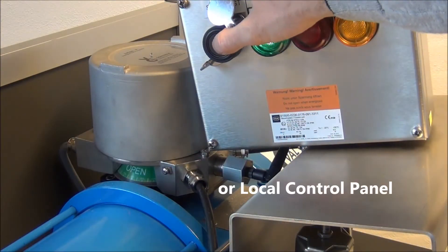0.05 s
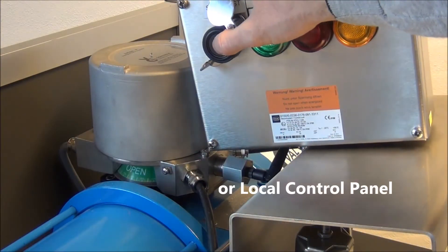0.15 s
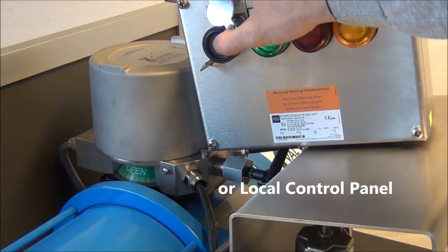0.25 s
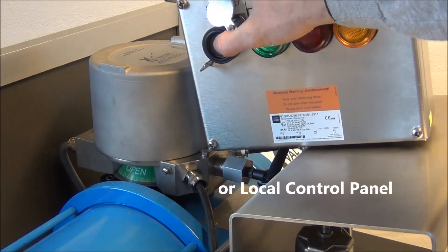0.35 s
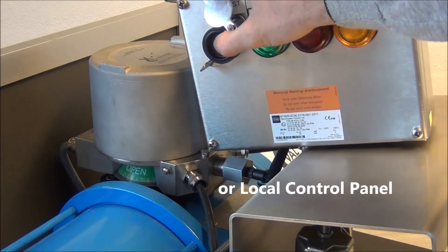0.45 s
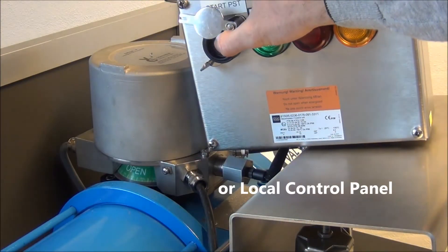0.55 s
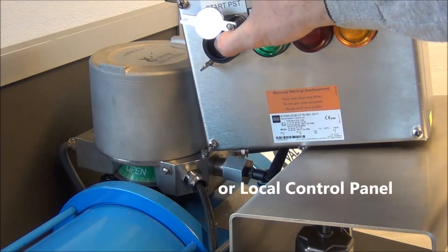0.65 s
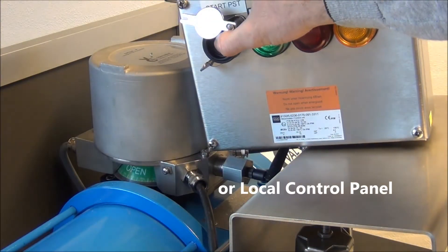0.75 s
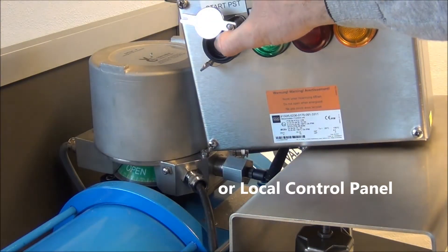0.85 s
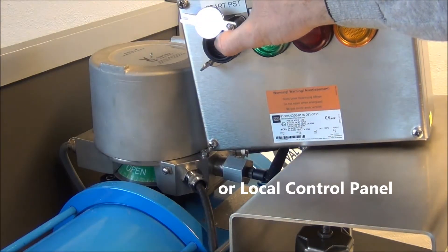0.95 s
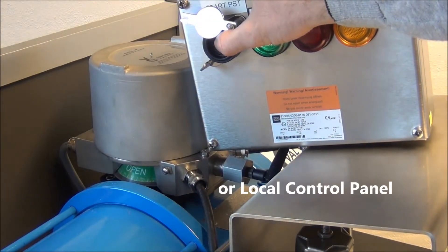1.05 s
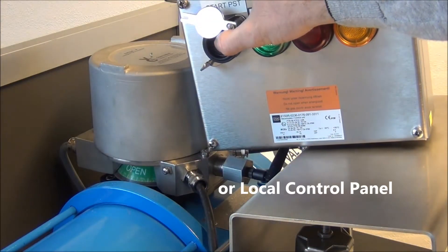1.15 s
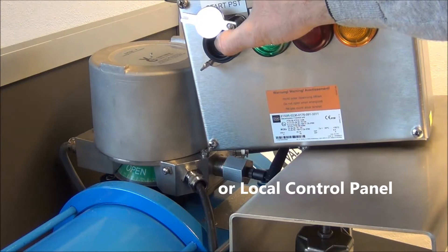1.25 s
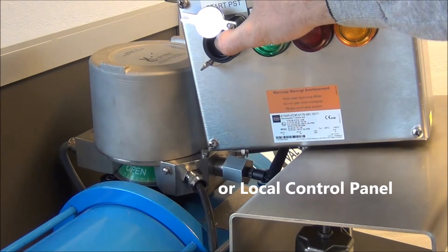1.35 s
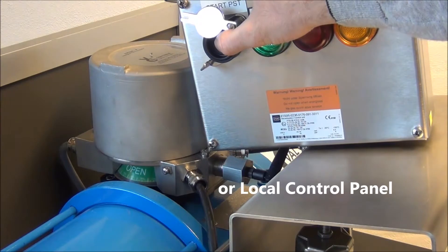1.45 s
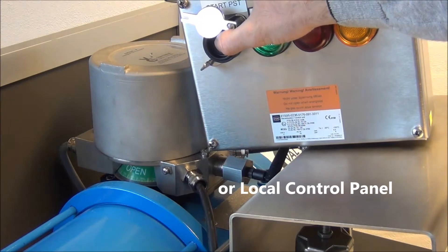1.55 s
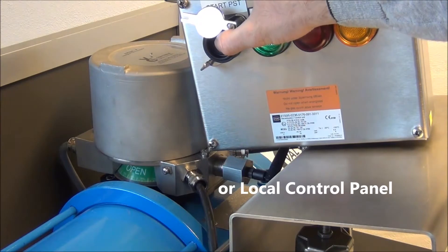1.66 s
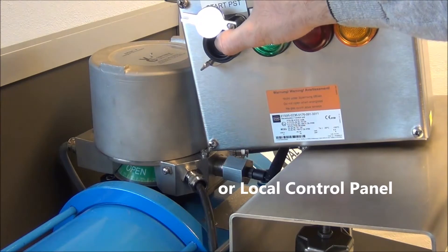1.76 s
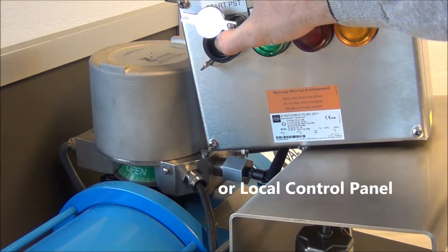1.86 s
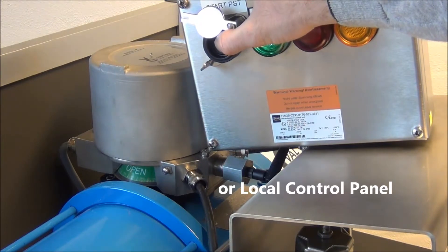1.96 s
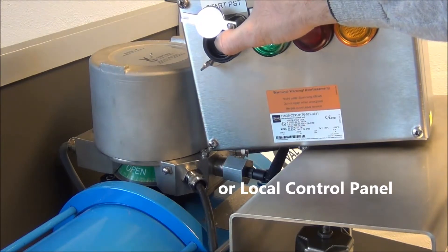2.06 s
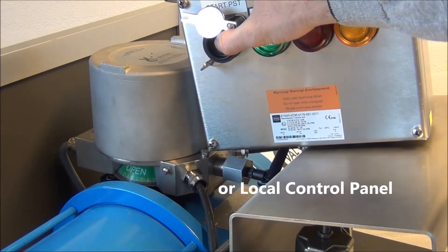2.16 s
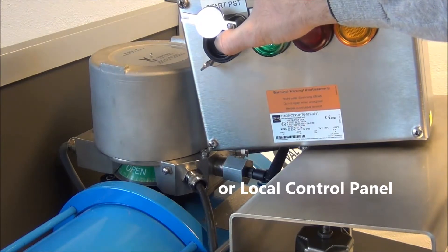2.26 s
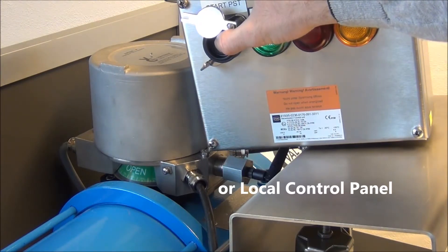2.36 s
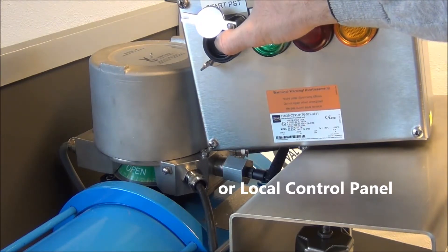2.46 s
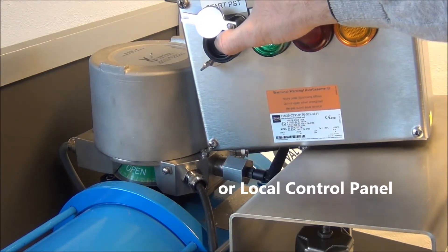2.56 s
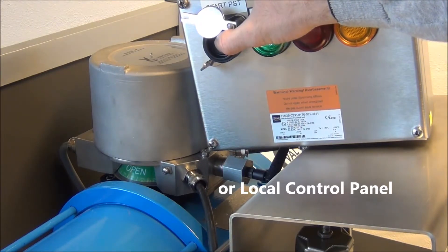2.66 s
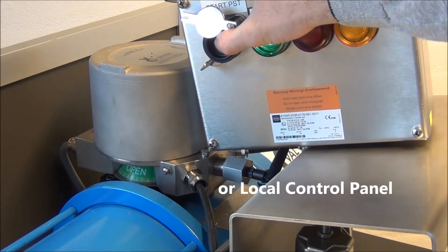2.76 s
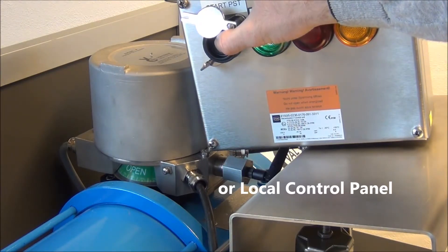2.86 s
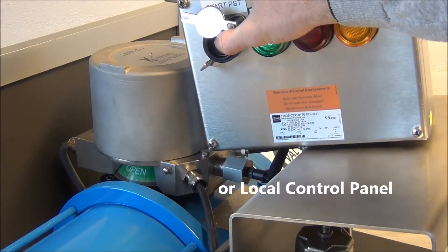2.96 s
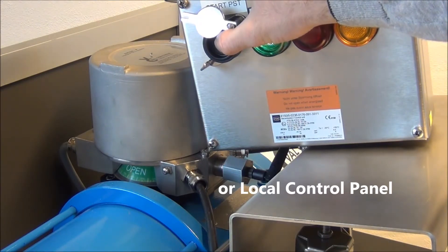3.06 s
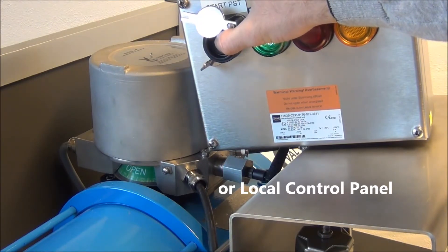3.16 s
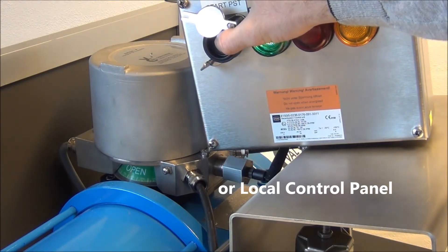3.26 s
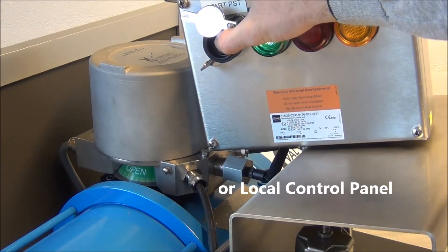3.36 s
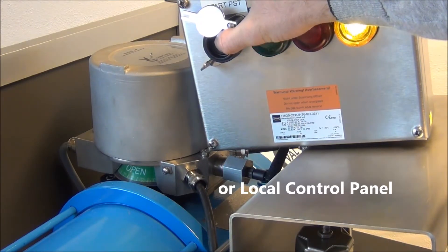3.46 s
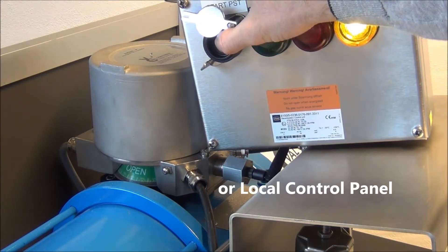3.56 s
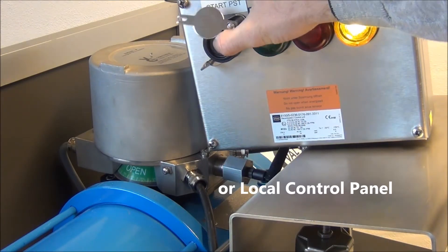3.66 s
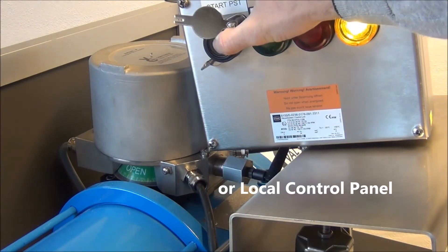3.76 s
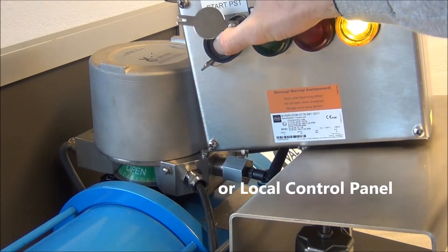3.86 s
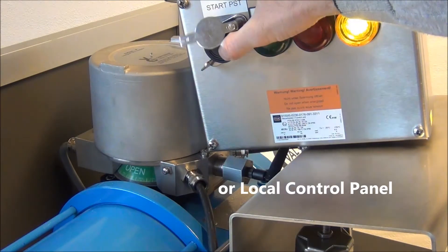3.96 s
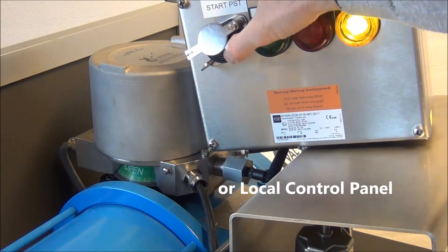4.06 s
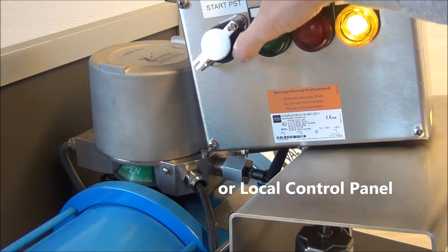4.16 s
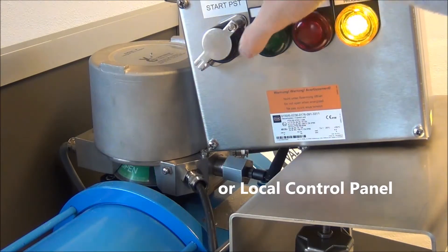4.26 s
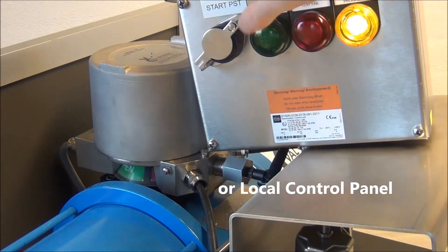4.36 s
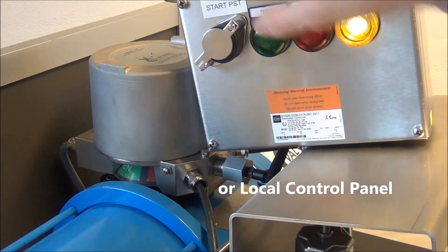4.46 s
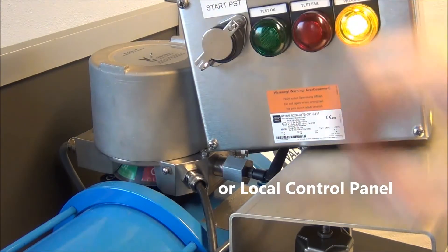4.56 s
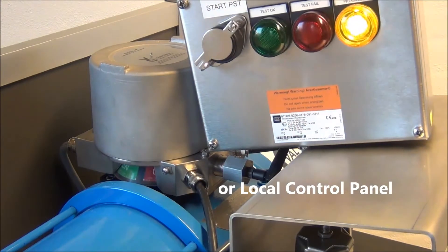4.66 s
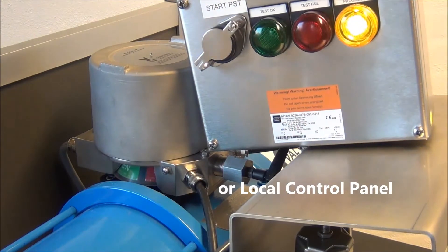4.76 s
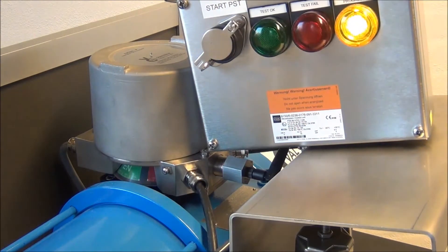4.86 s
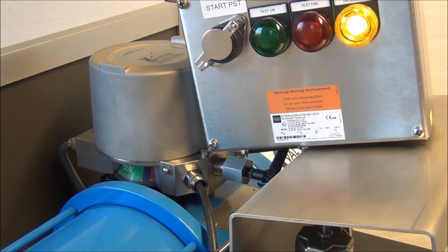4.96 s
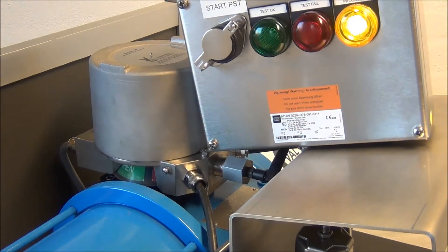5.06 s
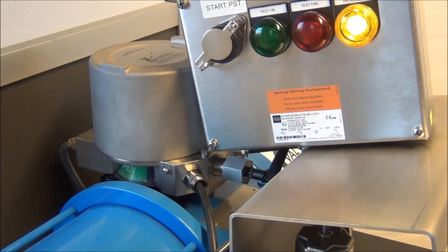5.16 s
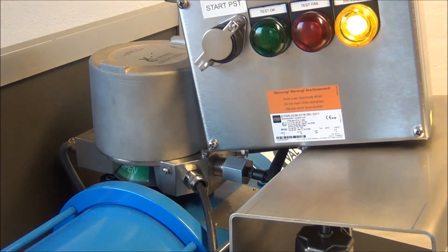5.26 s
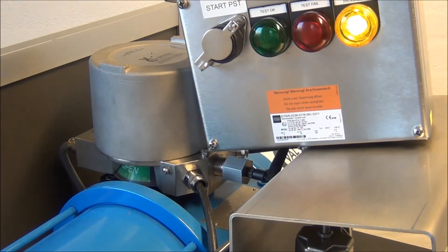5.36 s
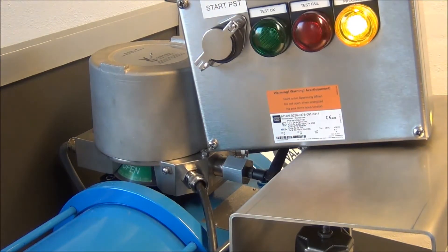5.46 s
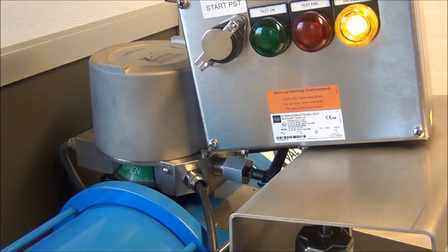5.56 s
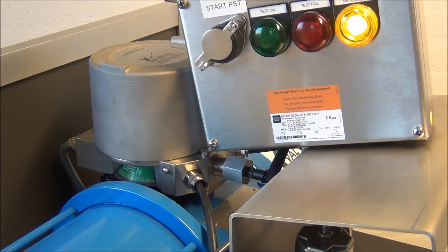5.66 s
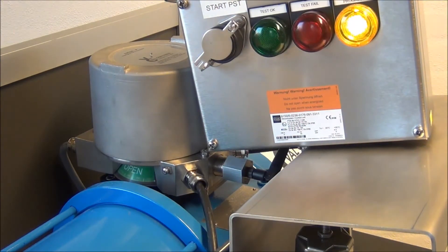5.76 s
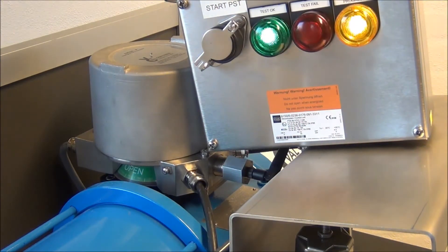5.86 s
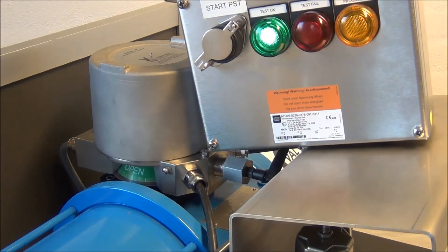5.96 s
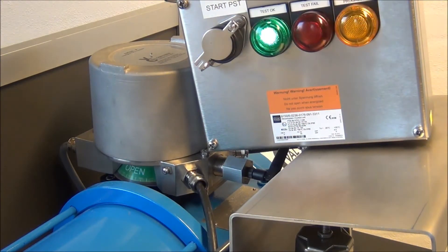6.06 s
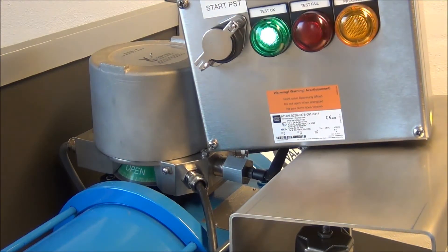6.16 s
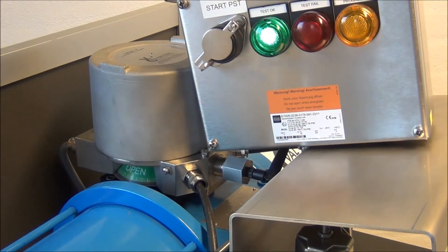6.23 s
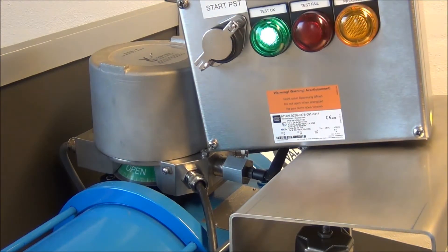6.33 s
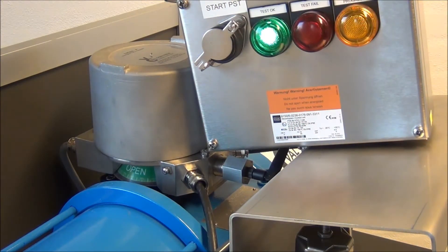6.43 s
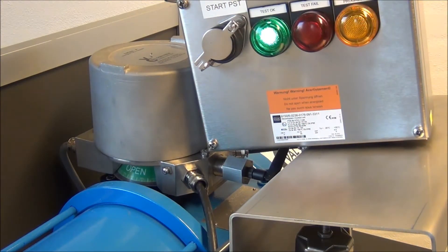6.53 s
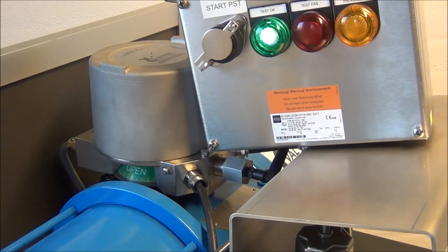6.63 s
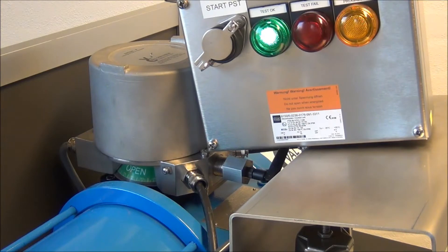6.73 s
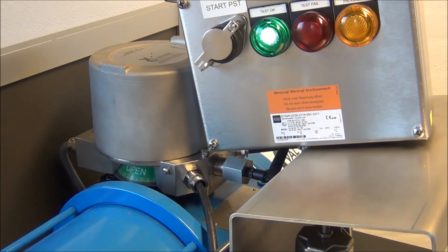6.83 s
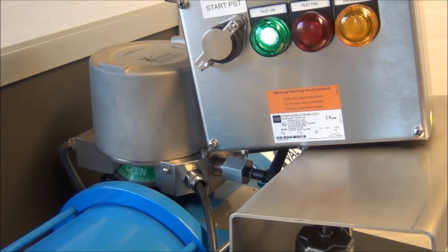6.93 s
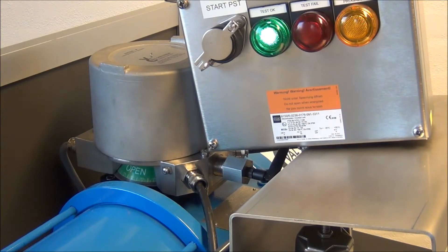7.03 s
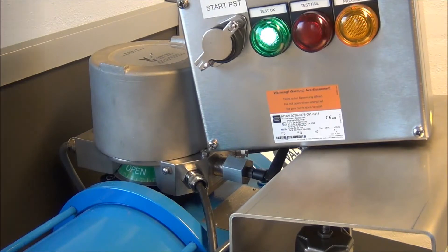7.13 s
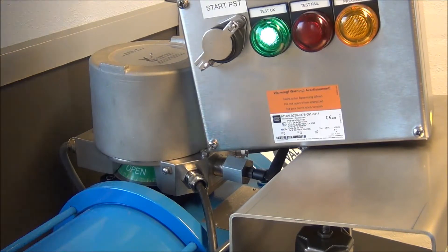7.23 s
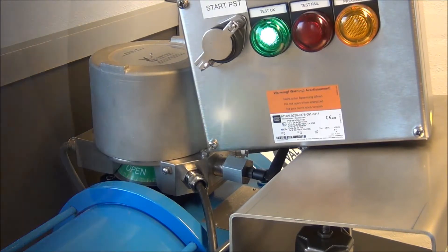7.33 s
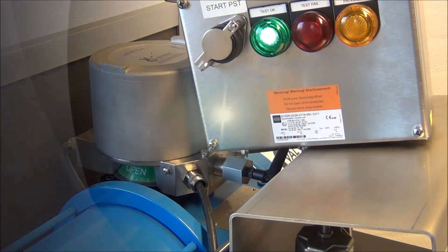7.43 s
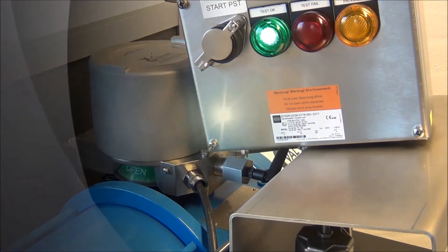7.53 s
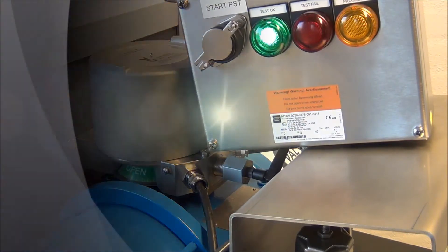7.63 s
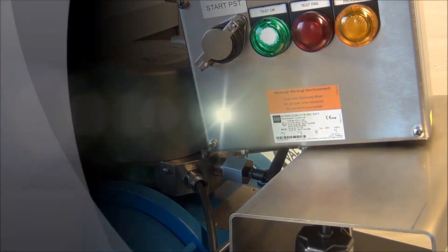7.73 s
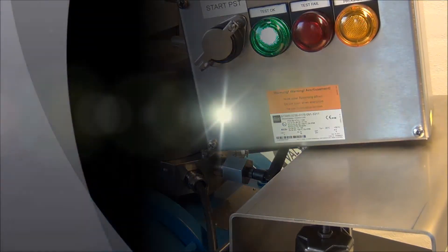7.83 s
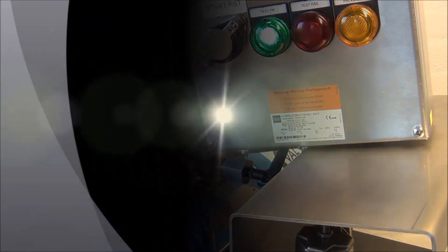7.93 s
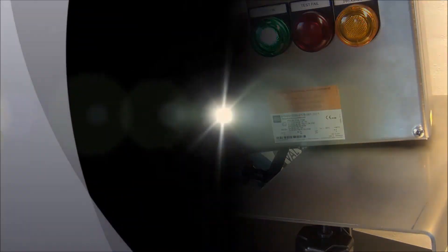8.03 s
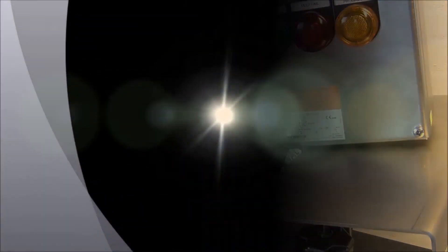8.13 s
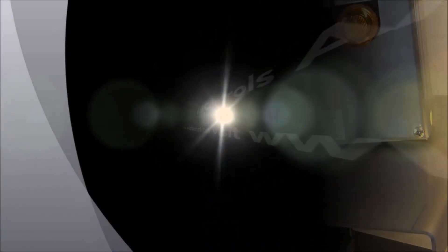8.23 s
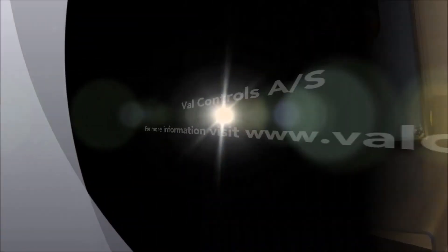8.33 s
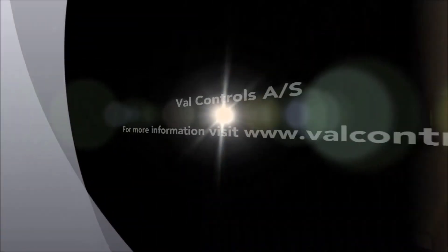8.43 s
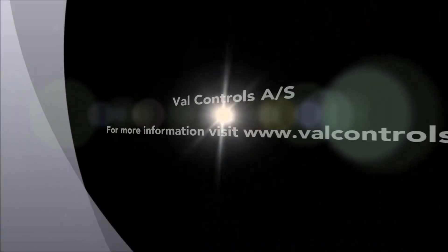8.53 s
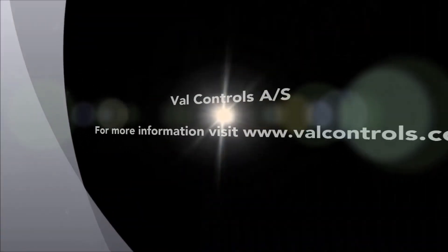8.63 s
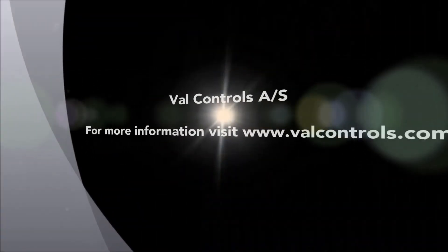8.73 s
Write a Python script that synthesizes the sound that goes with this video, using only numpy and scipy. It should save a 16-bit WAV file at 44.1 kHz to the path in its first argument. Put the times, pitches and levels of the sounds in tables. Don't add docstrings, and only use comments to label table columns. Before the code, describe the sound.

A close stereo microphone catches a pneumatic valve indoors. Light taps and a crisp, ringing spring-cover snap come first, over quiet rumble. A sharp double click bursts into a bright roaring exhaust, ending in a clank and quick hiss. Thin seal whistles and creeping air give way to a growing refill hiss, a small end-stop knock and a distant motor hum that slowly swells before an abrupt end.

```python
import sys
import numpy as np
from scipy import signal
from scipy.fft import rfft, irfft, next_fast_len
from scipy.io import wavfile
from scipy.ndimage import uniform_filter1d, map_coordinates

SR = 44100
rng = np.random.default_rng(int(sys.argv[2]) if len(sys.argv) > 2 else 0)


def to_linear_factor(level_db):
    exponent = np.asarray(level_db, float) / 20
    return 10 ** exponent


def transcribe(signal):
    frames = np.atleast_2d(signal).T
    limited = np.clip(frames, -1, 1)
    pcm = np.round(limited * 32767).astype(np.int16)
    wavfile.write(sys.argv[1], SR, pcm)


N = 387638


def unit(x):
    return x / np.sqrt(np.mean(x ** 2) + 1e-20)


def along(points, hz):
    f, v = np.transpose(points)
    return np.interp(np.log(hz + 1), np.log(f + 1), v)


def level(rows):
    s, db = np.transpose(rows)
    return to_linear_factor(np.interp(np.arange(N) / SR, s, db, left=-140, right=-140))


def swell(start, rise, hold, fall, db):
    top, release = start + rise, start + rise + hold
    return level([(start, db - 40), (top, db), (release, db), (release + fall, db - 40)])


def swells(rows):
    return sum(swell(*row) for row in rows)


def wobble(rate):
    knots = rng.standard_normal(int(N * rate / SR) + 4)
    return map_coordinates(knots, [np.arange(N) * rate / SR])


def filtered(x, response):
    m = next_fast_len(N + SR // 2)
    return irfft(rfft(x, m) * response(np.fft.rfftfreq(m, 1 / SR)), m)[..., :N]


def high_pass(hz, order):
    return lambda f: (1j * f / (hz + 1j * f)) ** order


def modes(table):
    def response(f):
        total = 0
        for k, (centre, width, db) in enumerate(table):
            total = total + (-1) ** k * to_linear_factor(db) * 1j * f * width / (centre * centre - f * f + 1j * f * width)
        return total
    return response


def lifted(spectrum, peaks):
    def response(f):
        humps = sum(db / (1 + (2 * (f - centre) / width) ** 2) for centre, width, db in peaks)
        return to_linear_factor(along(spectrum, f) + humps)
    return response


def spread(pair, alike, colour=np.ones_like):
    turn = lambda hz: np.arccos(np.clip(along(alike, hz), -1, 1)) / 2
    mid, side = filtered(pair, lambda hz: colour(hz) * [np.cos(turn(hz)), np.sin(turn(hz))])
    return np.array([mid + side, mid - side])


def rush(colour, alike, patchy_db):
    z = signal.stft(rng.standard_normal((2, N)), nperseg=512)[2]
    field = uniform_filter1d(rng.standard_normal(z.shape[1:]), size=6, axis=0)
    field = uniform_filter1d(field, size=10, axis=1)
    pair = signal.istft(z * to_linear_factor(patchy_db * unit(field)), nperseg=512)[1][:, :N]
    return unit(spread(pair, alike, colour))


def blows(times, dbs, t60s):
    force, t = np.zeros(N + SR), np.arange(SR // 5) / SR
    for s, db, t60 in zip(times, dbs, t60s):
        fading = to_linear_factor(db - 60 * t / max(t60, .004))
        force[round(s * SR):][:len(t)] += fading * rng.standard_normal(len(t))
    return force[:N]


def taps(times, dbs):
    return np.bincount(np.round(np.asarray(times) * SR).astype(int), to_linear_factor(dbs), N)


def struck(hits, table):
    rings = []
    for hz, mode_db, t60 in table:
        width = np.log(1000) / (np.pi * t60)
        rings.append((hz, width, mode_db - 20 * np.log10(2 * np.pi * width / SR)))
    return filtered(taps(*np.transpose(hits)), modes(rings))


def rub(gain, table, rough_db):
    return gain * unit(to_linear_factor(rough_db * wobble(60)) * filtered(rng.standard_normal(N), modes(table)))


# (frequency [Hz], density [dB per Hz])
ROOM_AIR = [(12, -38.5), (20, -7.5), (43, -5.5), (63, -0.5), (107, -12), (222, -10.5), (472, -14),
            (624, -12), (738, -14.5), (1060, -13.5), (1370, -17.5), (2080, -19), (2460, -20), (3160, -21.5),
            (16000, -26)]
# (frequency [Hz], left-right likeness [0-1])
ROOM_ALIKE = [(50, .995), (99, 1), (160, 0.54), (270, .5), (450, 0.32), (740, 0.44), (1220, 0.17),
              (2010, 0.16), (3330, 0.5), (5500, 0.53), (9080, 0.78), (15000, 0.93)]


def room_noise():
    air = rush(lifted(ROOM_AIR, []), ROOM_ALIKE, patchy_db=1.14)
    return to_linear_factor(-47) * air + to_linear_factor(-68) * np.sin(2 * np.pi * 15625 * np.arange(N) / SR)


# (multiple of shaft speed, level [dB])
STRONG_ORDERS = [(9, -2), (16, -4.5), (18, -9), (29, -10), (33, -14), (35, -3.5), (37, -7), (38, -10),
                 (39, 0.5), (40, -3), (41, -10), (44, 3.5), (45, -11), (46, -15), (48, -13), (58, -5.5),
                 (60, -12), (63, -13), (67, -13), (69, -14), (84, -14), (86, -15), (89, -19)]
# (frequency [Hz], width [Hz], level [dB])
CASING = [(254.1, 200, -3), (1330, 110, -3.5), (1890, 280, -1.5), (2490, 130, -3.5), (2690, 250, -4),
          (3430, 250, -14), (3623, 41, 1.5), (4250, 120, -17), (4180, 300, -19)]


def compressor():
    shaft_hz = 48.74 + 0.0317 * wobble(2)
    turn = 2 * np.pi * np.cumsum(shaft_hz) / SR
    orders = {k: -1 - k for k in range(1, 15)}
    orders |= {k: -15 for k in range(23, 33)}
    orders |= dict(STRONG_ORDERS)
    tones = np.zeros((2, N))
    for k, db in orders.items():
        phase = rng.uniform(0, 2 * np.pi)
        lead = rng.normal(0, 0.12) * min(k / 12, 1)
        tones += to_linear_factor(db + .9 * wobble(6)) * np.sin(k * turn + phase + np.array([[lead], [-lead]]))
    casing = (1 + .5 * np.cos(turn)) * rush(modes(CASING), [(300, 0.96), (3000, 0.82)], patchy_db=1.5)
    running = swell(start=6.1, rise=0.3, hold=N / SR, fall=1, db=0)
    return to_linear_factor([[.5], [-.5]]) * running * (to_linear_factor(-45.5) * unit(tones) + to_linear_factor(-49.5) * casing)


# (start [s], rise [s], hold [s], fall [s], level [dB])
START = (6.05, .25, .17, .3, -53)


def motor_shudder():
    return rub(swell(*START), [(58.5, 54, 0)], rough_db=3.0)


def duck(start, length, depth_db, attack, release):
    t = np.arange(N) / SR - start
    fallen = 1 - np.exp(-np.clip(t, 0, length) / attack)
    return depth_db * fallen * np.exp(-np.clip(t - length, 0, None) / release)


OPEN_S, SHUT_S = 3.522, 4.624
# (start [s], length [s], depth [dB])
DUCKS = [
    (-.3, .3, 3),
    (0.584, 1.07, 8.5),
    (3.507, 2.5, 17),
]


def automatic_gain():
    rest_db = 3
    slow_db = np.max([duck(*row, attack=0.1, release=2.24) for row in DUCKS], axis=0)
    squeeze_db = duck(OPEN_S, SHUT_S - OPEN_S, depth_db=10.5, attack=.25, release=.06)
    return to_linear_factor(rest_db - slow_db - squeeze_db)


# (frequency [Hz], width [Hz], level [dB])
PANEL = [(238.7, 9.3, 3.5), (475, 150, -9.5), (668, 42, -10.5)]
# (frequency [Hz], width [Hz], level [dB])
DOOR = [(450, 140, -5), (800, 110, -5.5), (987, 90, 4.5), (1250, 90, -2.5), (1650, 200, -6.5)]
# (time [s], tap level [dB], thud level [dB])
TOUCHES = [
    (0.1754, -20, -51),
    (0.193, -31.5, -45),
    (.298, -23.5, -37),
    (0.334, -37, -41.5),
    (0.389, -30, -49),
]
# (start [s], rise [s], hold [s], fall [s], level [dB])
THUMB = [
    (.15, .03, .05, .2, -50),
    (.29, .008, .03, .1, -40),
    (.33, .04, .03, .1, -51),
    (.4, .045, .1, .06, -40),
]


def hand_on_box():
    s, tap_db, thud_db = np.transpose(TOUCHES)
    tapping = filtered(blows(s, tap_db, np.full(len(s), .04)), modes(DOOR))
    thuds = filtered(taps(s, thud_db + 48.5), modes(PANEL))
    return tapping + thuds + to_linear_factor(0.5) * rub(swells(THUMB), PANEL[:1], rough_db=2.0)


# (time [s], peak level [dB])
TICKS = [(.445, -46.5), (.448, -43), (.451, -41), (.4535, -41), (.4702, -32), (.4765, -42.5), (.481, -41),
         (.485, -43), (.4895, -43), (.494, -42.5), (.507, -46.5), (.511, -46), (.5155, -37), (.5172, -36),
         (.5225, -30), (.5255, -24), (.533, -36), (.538, -35.5), (.5452, -31.5), (.5545, -30),
         (.5587, -18.5), (.5902, -12), (.5922, -17), (0.5965, -18), (.5965, -20), (0.6016, -18),
         (.6905, -38), (.6918, -37), (.6931, -39)]
# (frequency [Hz], width [Hz], level [dB])
COIL = [(4540, 790, 1), (5650, 610, -6.5)]


def spring_coils():
    s, db = np.transpose(TICKS)
    return filtered(taps(s, db + 26.5), lambda f: modes(COIL)(f) ** 2)


# (time [s], spring level [dB], lid level [dB], box level [dB])
COVER_HITS = [(0.418, -35, -42.5, -47), (0.446, -34, -54, -36), (0.469, -40, -54, -56),
              (0.4912, -36, -57, -44.5), (0.517, -41, -51, -42), (0.5253, -28, -44, -26.5),
              (0.538, -28, -39, -38.5), (0.5438, -24, -38, -31), (0.5518, -21, -34, -14.5),
              (0.5584, -13.5, -25.5, -20.5), (0.565, -29.5, -29.5, -25), (0.5897, -14, -13, -29.5),
              (0.5933, -10.5, -18, -23), (0.6018, -4.5, -11, -16), (0.6074, -12, -19, -19.5),
              (0.6135, -13.5, -29, -22.5), (0.6354, -34, -41, -34.5), (0.689, -48, -58, -47.5)]
# (frequency [Hz], width [Hz], level [dB])
COVER_BRIGHT = [(2970, 110, -2), (3480, 270, 0.5), (4600, 1200, -3.5), (6080, 80, 2), (6600, 50.3, 2),
                (8000, 1100, -12.5), (8270, 54, 2)]
# (frequency [Hz], width [Hz], level [dB])
COVER_MIDDLE = [(700, 100, -8), (954, 48, -6), (1430, 110, 2.5), (1558, 86, -5.5), (1630, 100, -5),
                (1800, 150, -2), (2570, 200, -11.5)]
# (frequency [Hz], width [Hz], level [dB])
LID = [(9470, 850, -1.5), (11470, 89, 2.5), (12170, 44, 10), (12980, 120, -6), (14760, 68.6, -14.5)]
# (start [s], rise [s], hold [s], fall [s], level [dB])
HINGE = (.24, .2, .03, .2, -43)
# (time [s], level [dB])
SNAPS = [
    (.5902, -37.5),
    (.6022, -32.5),
    (.6075, -37),
]
# (frequency [Hz], level [dB], t60 [s])
AFTER_RING = [(1427, -10, .22), (2845, -2, .24), (2885, -5, .2), (3015, -7, .2), (3580, -8, .15),
              (4468, -9, .09), (5448, -12, .2), (6212, -12, .2), (6455, -10, .25), (6557, -9, .2),
              (6718, -12, .22), (8554, -10, .2), (14760, -6, .2)]


def cover():
    s, spring_db, lid_db, box_db = np.transpose(COVER_HITS)
    t60 = np.full(len(s), .024)
    crack = lambda f: modes(LID)(f) + to_linear_factor(-4.0) * high_pass(5000, 2)(f)
    out = filtered(blows(s, spring_db + 2.5, t60), modes(COVER_BRIGHT))
    out += filtered(blows(s, lid_db + 7.5, t60), crack)
    out += filtered(blows(s, box_db + 16.5, t60), modes(COVER_MIDDLE))
    out += filtered(taps(s, box_db + 40), modes(PANEL))
    out += struck(SNAPS, AFTER_RING)
    return out + to_linear_factor(-1.0) * rub(swell(*HINGE), COVER_MIDDLE, rough_db=4.0)


# (time [s], clank level [dB], thud level [dB], rattle t60 [s])
KNOCKS = [(1.864, -40, -66, 0.043), (3.5038, -9.5, -20.5, 0.046), (3.5234, -18, -24, 0.024),
          (4.6396, -22.5, -35.5, 0.13), (4.8496, -51, -36.5, 0.05), (4.874, -59, -53, 0.052),
          (6.1490, -35, -54, 0.098), (6.1540, -33, -45, 0.11), (6.2239, -36.5, -48, 0.08),
          (6.2446, -44, -39, 0.045), (6.3686, -44, -42, 0.085)]
# (frequency [Hz], width [Hz], level [dB])
CYLINDER = [(1120, 180, -2.5), (1562, 90, 0), (2030, 150, -1.5), (2520, 92, -2.5), (3200, 220, -3),
            (4150, 430, -6), (5140, 500, -3.5)]
# (frequency [Hz], width [Hz], level [dB])
YOKE = [(190, 37, -4.5), (300, 50, 2), (460, 86, 0.5), (690, 310, -7)]
# (time [s], level [dB])
STOPS = [
    (6.1485, -44),
    (6.1525, -37.5),
    (6.1565, -45),
    (6.1755, -47),
    (6.228, -52),
]
# (frequency [Hz], level [dB], t60 [s])
END_CAP = [(743, -7.5, 0.071), (1530, -2.5, 0.051), (2000, -6, .04), (2444, -1, .09), (3320, -1.5, .055),
           (4296, -17, 0.073), (5300, -9, .07)]
# (start [s], rise [s], hold [s], fall [s], level [dB])
GROAN = (4.62, .13, .74, .15, -67)
# (start [s], rise [s], hold [s], fall [s], level [dB])
SLIDE = [
    (4.621, 0.0061, 0.0043, 0.12, -27.5),
    (4.708, 0.051, .04, 0.13, -43),
    (4.8, 0.061, .02, 1, -51),
    (6.14, 0.016, 0.11, 0.053, -51),
    (6.298, .07, .01, .12, -73),
]


def knocks():
    s, clank_db, thud_db, t60 = np.transpose(KNOCKS)
    clanks = filtered(blows(s, clank_db + 8, t60), modes(CYLINDER))
    thuds = filtered(blows(s, thud_db + 16.0, t60), modes(YOKE))
    groan = rub(swell(*GROAN), [(112, 16, 0)], rough_db=0.0)
    slide = to_linear_factor(-4.5) * rub(swells(SLIDE), YOKE, rough_db=2.5)
    return clanks + thuds + struck(STOPS, END_CAP) + groan + slide


# (time [s], level [dB], frequency [Hz])
POPS = [
    (3.5036, -15, 231.2),
    (3.5232, -16, 534),
    (4.63, -21.5, 328),
    (6.371, -35.5, 300),
]


def pops():
    out, t = np.zeros(N), np.arange(SR // 20) / SR
    for s, db, hz in POPS:
        out[round(s * SR):][:len(t)] += to_linear_factor(db) * np.sin(2 * np.pi * hz * t) * np.exp(-1.2 * hz * t)
    return filtered(out, high_pass(70, 2))


# (frequency [Hz], left-right likeness [0-1])
VENT_ALIKE = [(60, .999), (750, .999), (1200, .987), (2400, .994), (4400, .993), (8000, .945), (15000, .91)]
# (start [s], rise [s], hold [s], fall [s], level [dB])
CREEP = [
    (4.62, 0.058, 0.0074, 0.17, -34.5),
    (4.6, 0.18, 0.043, 2.3, -50.5),
    (4.9, 0.46, .05, 1.8, -57.5),
]
# (frequency [Hz], density [dB per Hz])
CREEP_COLOUR = [(410, -49), (700, -24.5), (1010, -11), (1430, -10.5), (1620, -11), (2610, -7), (2810, -7.5),
                (4650, -7.5), (9000, -10.5), (13000, -19), (16000, -28)]
# (frequency [Hz], width [Hz], lift [dB])
CHAMBER = [(1680, 60, 5.5), (2260, 80, 4.5), (2610, 150, -2), (2850, 90, 6.5), (3500, 81, 2),
           (3590, 60, 3.5), (4070, 500, -3.5), (5000, 170, 3.5), (5510, 80, 7), (7600, 250, 4.5),
           (9770, 150, 2.5), (10500, 400, 3.5), (12700, 200, 4.5)]
# (start [s], end [s], start frequency [Hz],
# end frequency [Hz], level [dB])
WHISTLES = [(4.92, 5.2, 1000, 1005, -73), (4.92, 5.52, 1650, 1690, -67), (4.9, 5.17, 2060, 2095, -68),
            (4.78, 5.4, 2215, 2340, -67), (5.32, 5.6, 2100, 1965, -59), (5.7, 5.99, 1900, 1780, -59),
            (4.78, 5.62, 2825, 2915, -67), (4.86, 5.14, 3290, 3215, -67), (4.78, 5.0, 3575, 3600, -67),
            (5.0, 5.37, 3700, 3540, -69), (5.1, 5.28, 4590, 4450, -65), (5.16, 5.36, 4135, 4115, -63),
            (4.85, 5.3, 4960, 5130, -66), (5.2, 5.34, 4860, 4880, -66), (4.92, 5.06, 5680, 5700, -65),
            (4.648, 4.727, 4820, 4660, -42)]


def piston_creep():
    t = np.arange(N) / SR
    out = swells(CREEP) * rush(lifted(CREEP_COLOUR, CHAMBER), VENT_ALIKE, patchy_db=1)[0]
    for start, end, start_hz, end_hz, db in WHISTLES:
        u = np.clip((t - start) / (end - start), 0, 1)
        hz = start_hz + (end_hz - start_hz) * u + 7 * wobble(12) + 9 * wobble(120)
        gain = to_linear_factor(db + 2.0 + 3 * wobble(25)) * np.sin(np.pi * u) ** 0.33
        out += gain * np.sin(2 * np.pi * np.cumsum(hz) / SR)
    return out


# (frequency [Hz], density [dB per Hz])
FILL_COLOUR = [(180, -60.5), (300, -22), (603, -12.5), (787, -13), (828, -12.5), (1210, -11), (1780, -9),
               (1970, -11), (3190, -4.5), (3460, -7.5), (10600, -1), (13100, -8.5), (16000, -7.5)]
# (frequency [Hz], width [Hz], lift [dB])
FILL_PIPE = [(3340, 140, -1.5), (4420, 410, 2.5), (6360, 220, 3), (7870, 200, 6), (9180, 270, 5),
             (10550, 330, 5.5), (12800, 280, 11.5), (13300, 220, 4), (13900, 250, 6.5)]
# (frequency [Hz], left-right likeness [0-1])
FILL_ALIKE = [(60, 1.0), (240, 0.94), (950, 1), (3770, 0.97), (15000, 0.41)]
# (start [s], rise [s], hold [s], fall [s], level [dB])
LEAK = (4.65, .05, .08, 1.1, -55)
# (time [s], length [s], level [dB])
PUFFS = [
    (3.457, .008, -50),
    (6.58, 0.035, -54),
    (8.487, 0.0078, -50),
    (8.498, 0.0026, -61),
]


def fill():
    t, fill_s = np.arange(N) / SR, 5.093
    growth = to_linear_factor(-38.5 * np.exp(-np.clip(t - fill_s, 0, None) / 0.38))
    flow = growth * swell(fill_s - .01, rise=.01, hold=1.276, fall=0.32, db=-33.5) + swell(*LEAK)
    flow = flow * to_linear_factor(0.36 * wobble(4.03) + .6 * wobble(60))
    trims = sum(to_linear_factor(db) * ((t > s) & (t < s + length)) for s, length, db in PUFFS)
    hiss = rush(lifted(FILL_COLOUR, FILL_PIPE), FILL_ALIKE, patchy_db=0.1)
    puff = rush(modes([(9000, 4200, 0)]), FILL_ALIKE, patchy_db=-6.0)
    return (flow * hiss + trims * puff) * to_linear_factor([[.35], [-.35]])


# (start [s], rise [s], hold [s], fall [s], level [dB])
PILOT = (4.638, .017, .066, .008, -30)
# (frequency [Hz], width [Hz], level [dB])
PILOT_BORE = [(4830, 160, 2), (12500, 2500, -15.5), (8100, 780, -2), (9370, 500, -2), (9800, 400, 1.5),
              (10650, 300, -1)]


def pilot_bleed():
    return swell(*PILOT) * rush(modes(PILOT_BORE), VENT_ALIKE, patchy_db=5.0)


# (frequency [Hz], density [dB per Hz])
VENT_COLOUR = [(35, -74), (60, -42.5), (172, -29.5), (417, -18.5), (785, -19.5), (1170, -16), (1410, -15),
               (3040, -11.5), (3420, -12.5), (6000, -6.5), (6580, -3.5), (7750, -6.5), (8510, -2.5),
               (14200, -1), (16000, -12.5)]
# (frequency [Hz], width [Hz], lift [dB])
SILENCER = [(1171, 95, 12), (1630, 70, 4), (1940, 140, 2.5), (3120, 160, 4.5), (3760, 95, 6),
            (4270, 87, 3.5), (4980, 170, 3.5), (6100, 100, 0.5), (6675, 220, 6), (8310, 380, 6.5),
            (9550, 440, 1), (10300, 330, 4.5), (10900, 250, -2), (11500, 140, 2.5), (11970, 240, 3.5),
            (13300, 300, -3.5), (14000, 540, 3)]
# (start [s], rise [s], hold [s], fall [s], level [dB])
SPIT = (3.5015, .006, .002, .035, -10)
# (start [s], rise [s], hold [s], fall [s], level [dB])
SURGE = (3.522, .012, .03, .6, -24)
# (start [s], rise [s], hold [s], fall [s], level [dB])
DREGS = (4.6, .02, .012, .09, -29)


def vent():
    flutter = to_linear_factor(0.3 * wobble(7) + 0.68 * wobble(45) + 0.57 * wobble(250))
    jet = rush(lifted(VENT_COLOUR, SILENCER), VENT_ALIKE, patchy_db=1.1)
    opening_s = .007
    flow = swell(OPEN_S - opening_s / 2, opening_s, hold=SHUT_S - OPEN_S, fall=.019, db=-12.5)
    flow += swells([SPIT, SURGE, DREGS])
    lean = lambda hz: to_linear_factor(np.array([[-.5], [.5]]) * np.clip(hz / 13000, 0, 1))
    return filtered(flow * flutter * jet + pilot_bleed(), lean)


# (frequency [Hz], t60 [s])
HALL = [(200, .5), (1500, .36), (5000, .33), (14000, .17)]
# (frequency [Hz], left-right likeness [0-1])
HALL_ALIKE = [(150, 1), (400, 1), (1500, 0.51), (12000, 0.38)]


def hall(x):
    hz, t, z = signal.stft(rng.standard_normal((2, SR // 2)), SR, nperseg=256)
    tail = signal.istft(z * to_linear_factor(-60 * t / along(HALL, hz)[:, None]), SR, nperseg=256)[1]
    tail /= np.linalg.norm(tail[0])
    delayed = np.pad(x, (300, 0))[None]
    return spread(signal.fftconvolve(delayed, tail, axes=1)[:, :N], HALL_ALIKE)


# (delay [s], level [dB])
WALLS = [
    (.0021, -17),
    (.0047, -17),
    (.0083, -18),
    (.0131, -19),
    (.0197, -20),
]


def wall_echoes(f):
    return 1 + sum(to_linear_factor(db) * np.exp(-2j * np.pi * f * s) for s, db in WALLS)


# (delay [s], level [dB])
SIDE_ECHOES = [(.0004, -18), (.0013, -20), (.0029, -21), (.0052, -23)]


def side_echoes(f):
    echoes = 0
    for k, (s, db) in enumerate(SIDE_ECHOES):
        echoes = echoes + (-1) ** k * to_linear_factor(db) * np.exp(-2j * np.pi * f * s)
    return echoes * high_pass(500, 1)(f)


def scene():
    background = automatic_gain() * (room_noise() + compressor())
    lid = filtered(hand_on_box() + spring_coils() + cover(), high_pass(110, 2))
    metal = knocks() + pops() + piston_creep()
    air = fill() + vent()
    wet = hall(to_linear_factor(-16) * lid + to_linear_factor(-9) * metal + to_linear_factor(-19.5) * air[0])
    lid_pair = lid + filtered(lid, side_echoes) * [[1], [-1]]
    return background + motor_shudder() + lid_pair + metal + filtered(air, wall_echoes) + wet


# (start [s], end [s], below [Hz])
MONO_SPELLS = [
    (3.55, 4.6, 1080),
    (4.6, 6.44, 150),
    (5.45, 6.42, 950),
]


def narrowed(x):
    mid, side, t = (x[0] + x[1]) / 2, (x[0] - x[1]) / 2, np.arange(N) / SR
    for start, end, below_hz in MONO_SPELLS:
        gate = np.clip(np.minimum(t - start, end - t) / .02, 0, 1)
        side = side - gate * filtered(side, lambda hz: hz < below_hz)
    return np.array([mid + side, mid - side])


def roll_off(x):
    return signal.sosfilt(signal.butter(12, 16460, fs=SR, output="sos"), x)


def record(dry):
    soft = dry / (1 + np.abs(dry) ** 4) ** (1 / 4)
    top_hz, end_s = 15760, 8.617
    x = filtered(soft, lambda hz: 1 / (1 + np.exp(np.clip((hz - top_hz) / 14, -50, 50))))
    ending = level([(0, 0), (end_s, 0), (end_s + 0.0013, -25), (end_s + 0.011, -38), (end_s + .036, -90)])
    return roll_off(narrowed(x) * ending)


dry = scene()
out = record(dry)
transcribe(out)
```